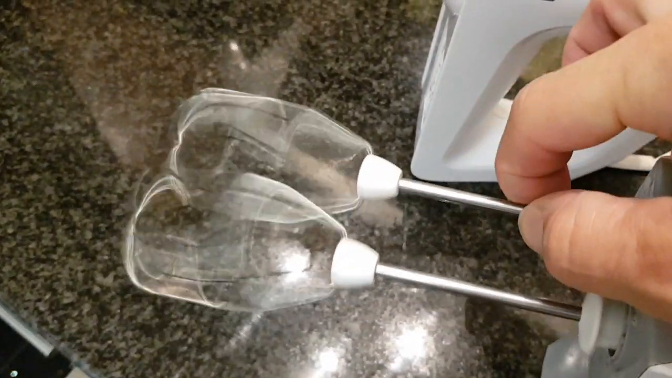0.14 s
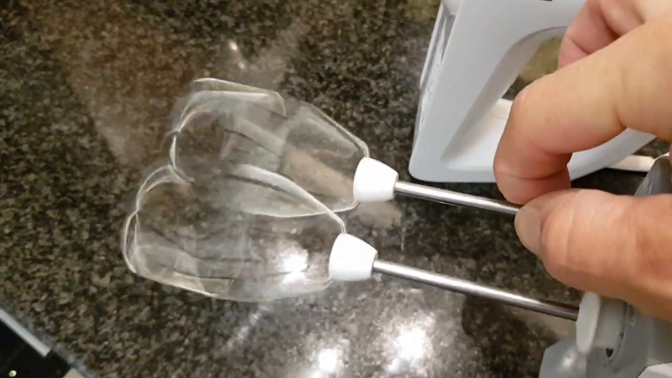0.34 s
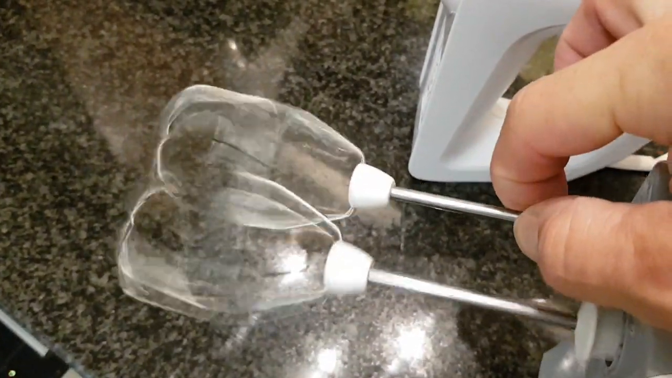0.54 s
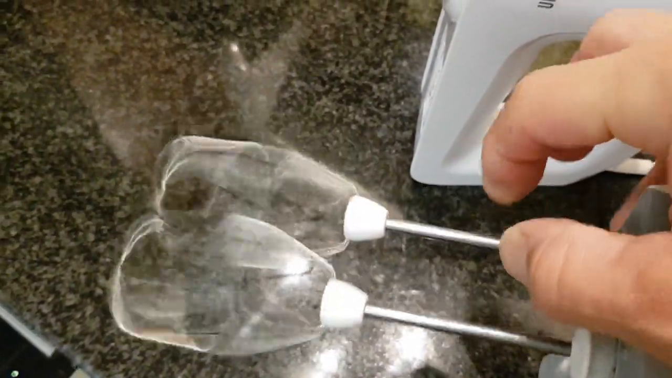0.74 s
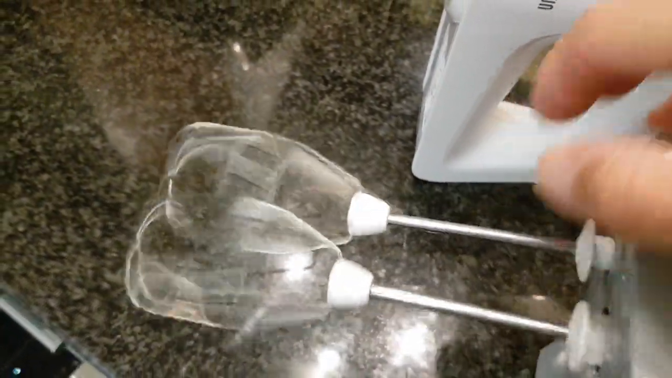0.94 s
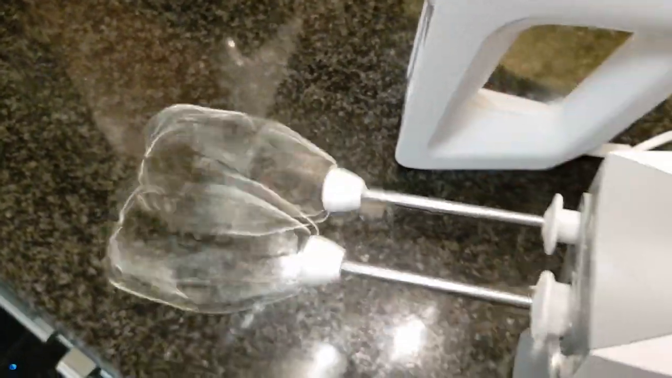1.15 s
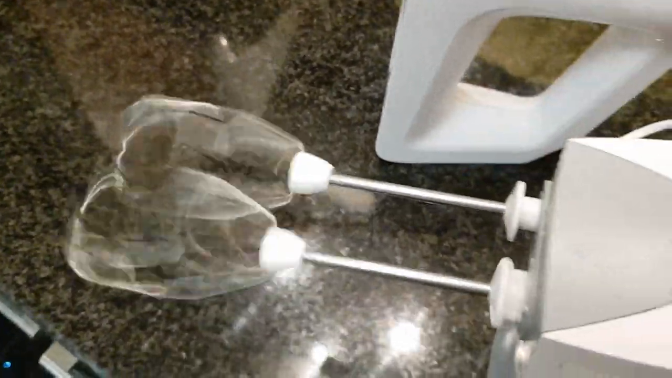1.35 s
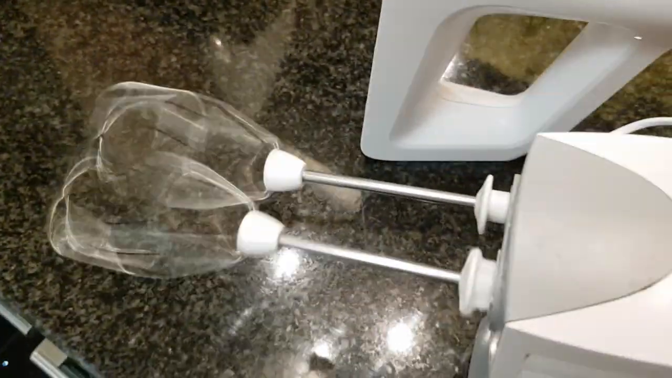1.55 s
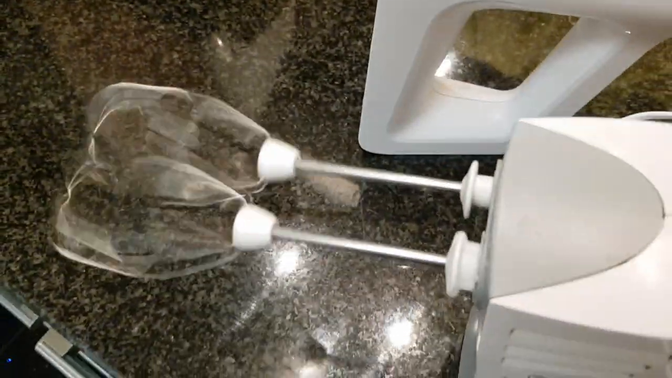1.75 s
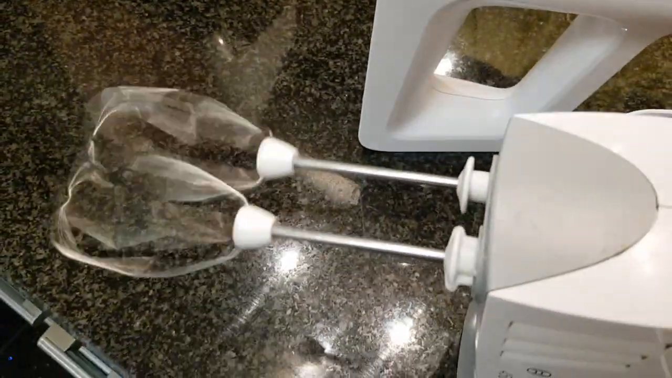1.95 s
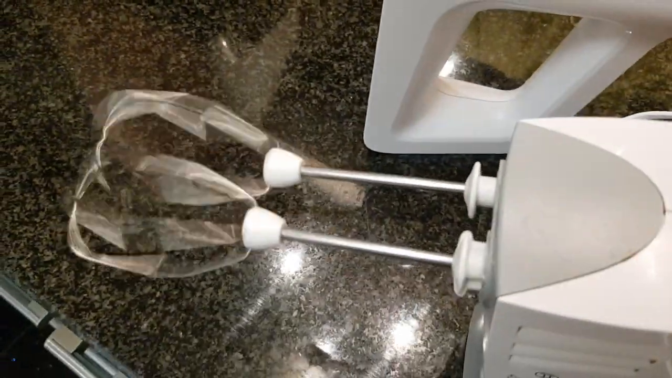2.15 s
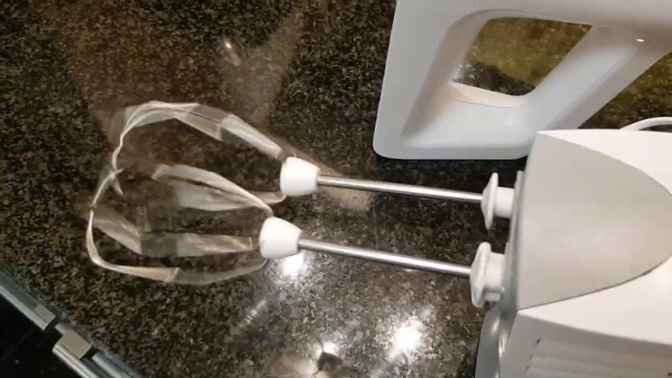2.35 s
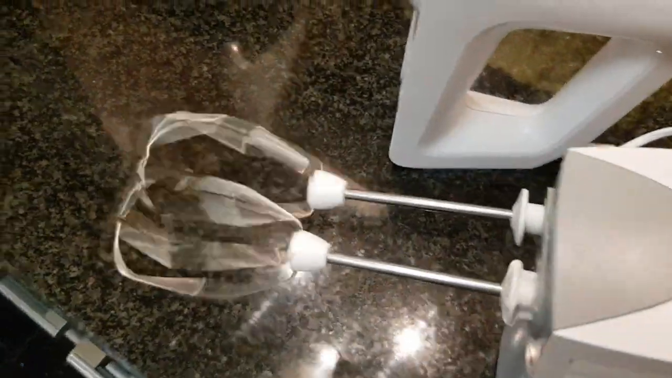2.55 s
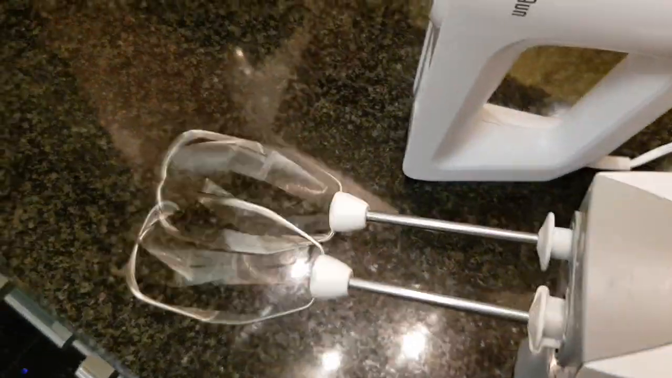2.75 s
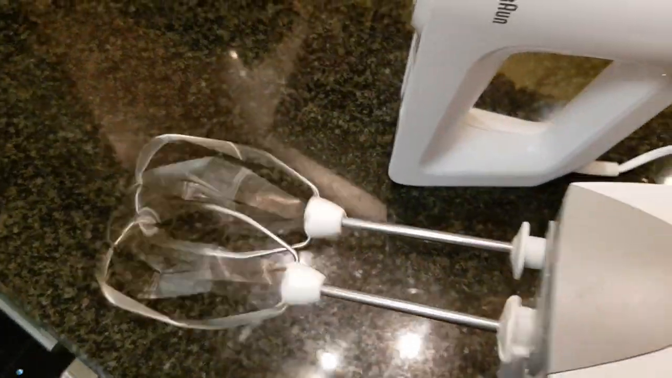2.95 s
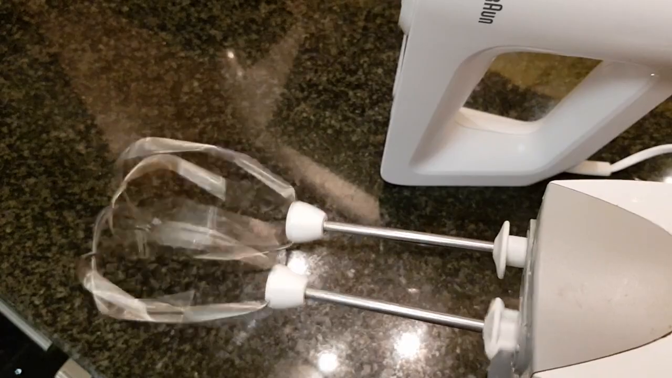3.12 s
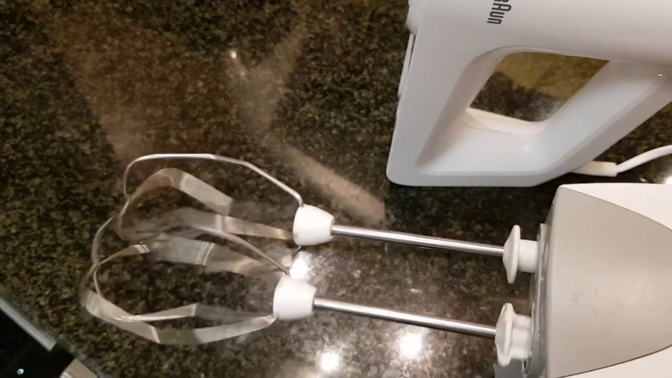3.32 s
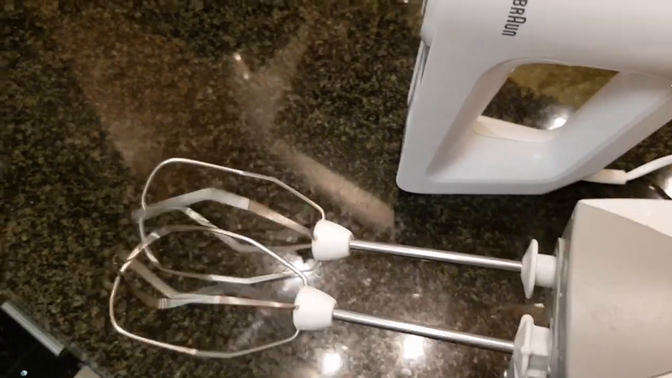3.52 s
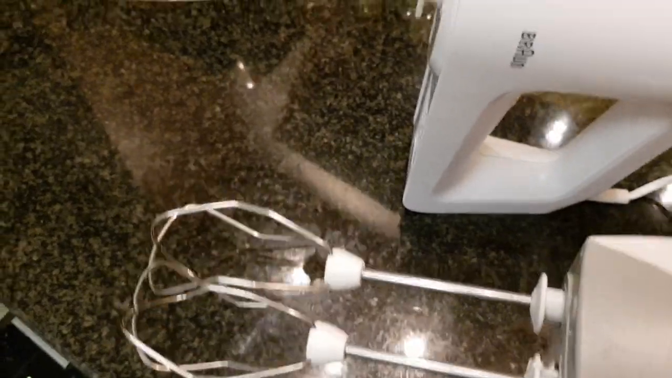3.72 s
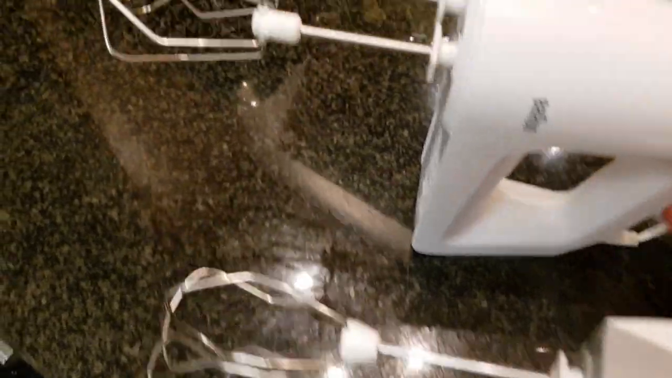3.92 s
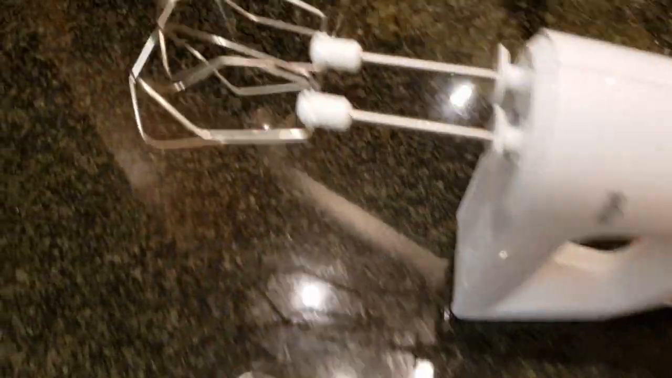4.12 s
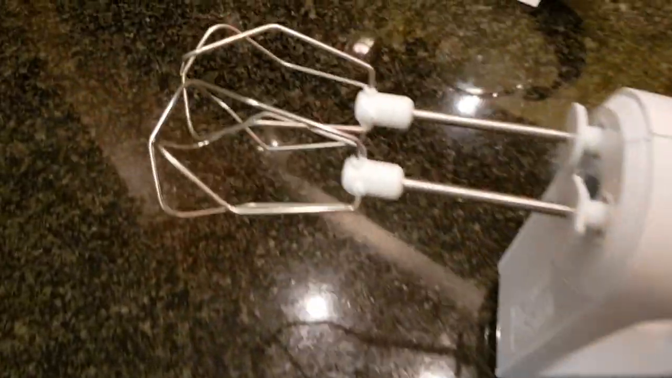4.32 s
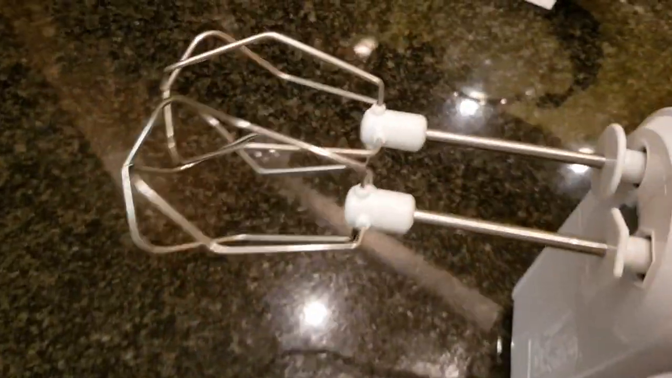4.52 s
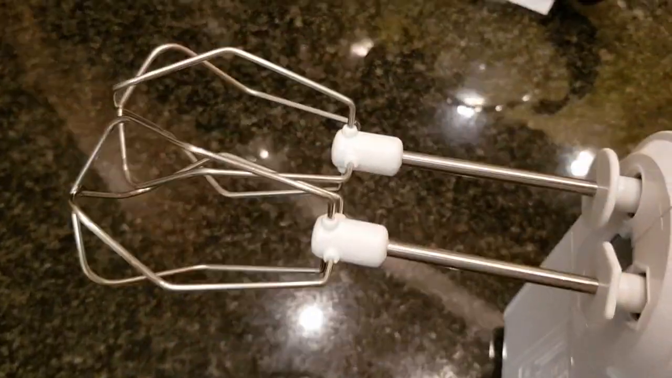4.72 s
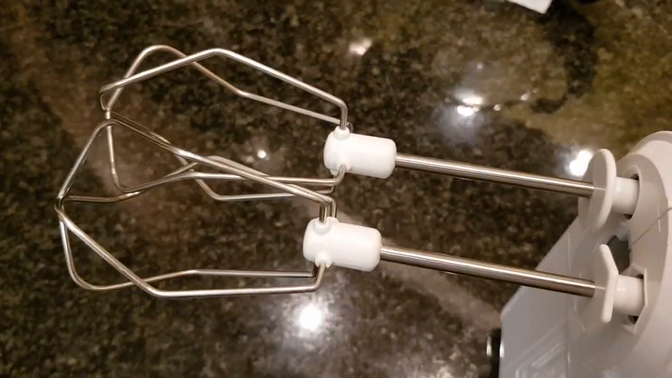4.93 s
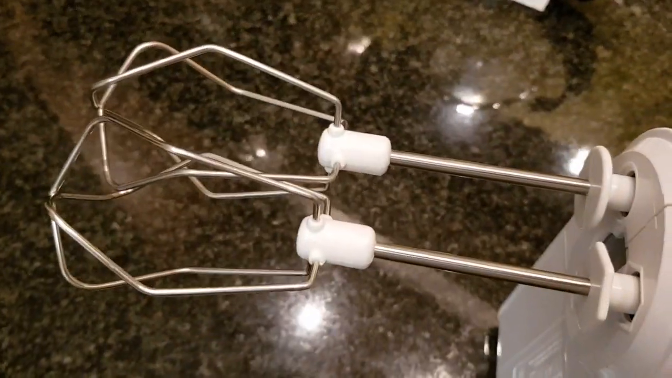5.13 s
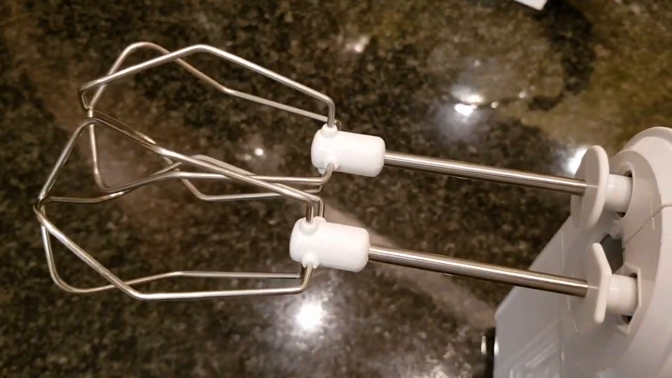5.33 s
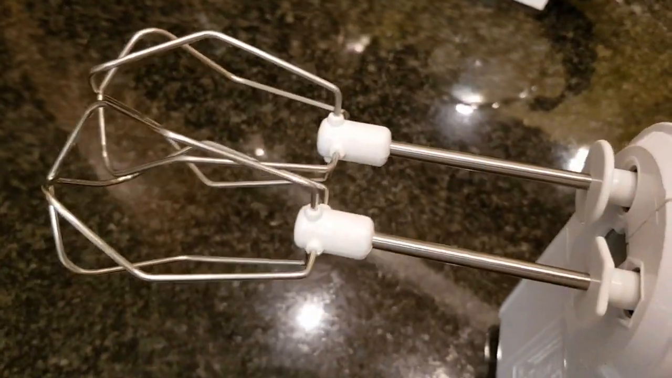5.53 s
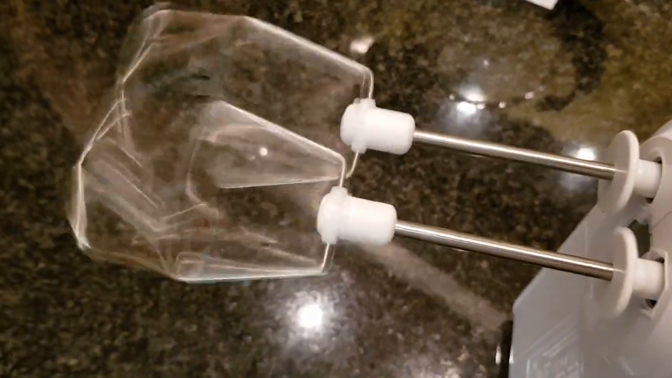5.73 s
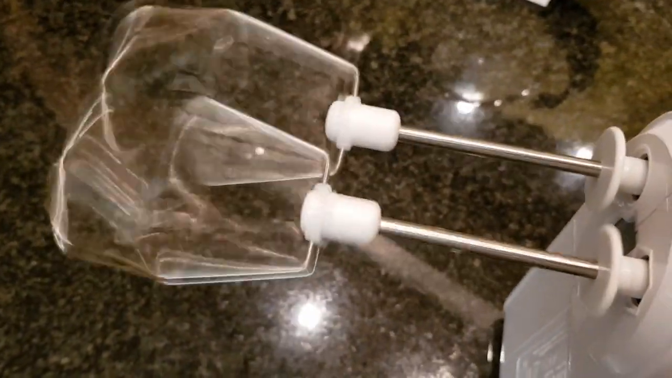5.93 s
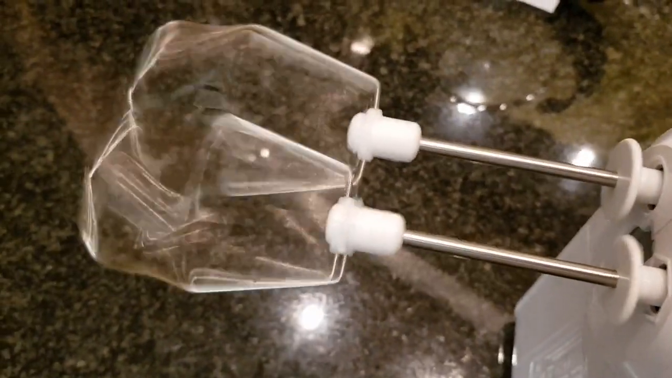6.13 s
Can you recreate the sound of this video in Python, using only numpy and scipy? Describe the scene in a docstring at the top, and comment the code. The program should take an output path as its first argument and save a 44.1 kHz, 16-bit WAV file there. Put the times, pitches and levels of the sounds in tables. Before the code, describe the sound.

An electric hand mixer is already whirring close by in a kitchen, its beaters spinning in the air with a fine gear rattle, hiss and thin whine. It speeds up slightly around 0.6 seconds, with a light knock. From about 1.8 seconds the pitch falls and a plastic switch clicks, and the motor settles into a slower, softer run, with small knocks near 2.4 and 2.7 seconds. At 3.2 seconds the switch clicks off and the motor winds down, stopping by 3.8 seconds. The mixer slides briefly and softly over the stone counter, leaving a faint room hum. A few light handling knocks come around 5.2 seconds as a second mixer is picked up. At about 5.7 seconds it starts abruptly with a raspy surge and keeps running, louder and brighter than the first, until the end at about 6.4 seconds.

```python
"""Two electric hand mixers spin wire beaters in the air, close by, over a stone kitchen counter.
Gear impacts excite the resonances of the plastic housings, brushes hiss on the commutators, and
tones sound at multiples of the rotor speed. The first mixer is clicked down to a slower speed,
switched off and braked to rest by friction; it is slid aside, and the second is picked up and
starts with a louder, brighter whirr. A quiet room hums underneath."""
import sys
import numpy as np
from scipy import signal
from scipy.fft import rfft, irfft
from scipy.io import wavfile
from scipy.ndimage import uniform_filter1d, map_coordinates

SR = 44100
rng = np.random.default_rng(int(sys.argv[2]) if len(sys.argv) > 2 else 0)


def digitize_waveform(pressure):
    """Quantize a signal to 16-bit integers and store it at the path in sys.argv[1].

    Rows of a 2-D input are taken as channels; values are limited to [-1, 1].
    """
    field = np.atleast_2d(pressure).T
    bounded = np.clip(field, -1, 1)
    quanta = np.round(bounded * 32767).astype(np.int16)
    wavfile.write(sys.argv[1], SR, quanta)


N = 276507

# Levels in the tables are relative. An order is a multiple of the rotor speed.
# ventilation noise spectrum: f/Hz, level/dB
ROOM_SPECTRUM = [(20, -30.5), (60, -14.5), (100, -3.5), (150, -18.5), (260, -8), (380, -1.5), (550, -14),
                 (1000, -24), (2500, -32), (6000, -35.5), (8500, -43), (13000, -30.5), (15700, -36)]
# appliance hum: f/Hz, level/dB
HUM_PARTIALS = [(102.3, -79.5), (145.3, -87.5), (199.2, -77.5), (296.1, -73.5)]
# a slide over the counter, then fingers on the handle: t/s, duration/s, level/dB
RUBS = [(3.798, 0.24, -53), (4.3, 0.11, -73), (4.602, .08, -65.5)]
# spectra of rubbing and of a blow on plastic: f/Hz, level/dB
RUB_SPECTRUM = [(530, -34), (900, -12.5), (991, -13), (1070, -19), (1490, -5), (2040, -2), (3190, 0),
                (7860, -3.5), (12300, -1), (16000, -3.5)]
PLASTIC_SPECTRUM = [(60, -23.5), (250, -29.5), (450, -7), (1100, -5), (2300, -9), (4500, -12),
                    (8000, -19.5), (16000, -7.5)]
# modes of the struck shell: f/Hz, width/Hz, gain/dB
PLASTIC_MODES = [(450, 60, 3.7), (618, 60, 1.7), (810, 160, 2.3), (1210, 140, 3.8), (2360, 250, 4.5),
                 (4170, 460, 3.4)]
# switch clicks; knocks of shafts and handles: t/s, level/dB, cutoff/Hz, ring time/s, hollow note/Hz
CLICKS = [(1.9015, -5.5, 13200, 0.098, 1000), (3.179, -10, 16080, 0.018, 450),
          (3.1815, -5.5, 9000, 0.042, 1118), (3.191, -16.5, 7060, .13, 460)]
KNOCKS = [(.712, -17, 2530, 0.075, 930), (2.4275, -14, 2300, 0.14, 910), (2.699, -21.5, 1980, 0.049, 1214),
          (3.321, -19, 760, 0.096, 597), (3.995, -37.5, 890, 0.32, 714), (4.545, -54, 1995, 0.12, 725),
          (5.203, -34.5, 1496, 0.17, 755), (5.224, -29, 1650, 0.15, 771), (5.393, -43.5, 1800, 0.24, 760),
          (5.590, -46, 1500, 0.08, 780)]
# spectra of gear rattle and brush hiss (A is the first mixer, B the second): f/Hz, level/dB
GEAR_SPECTRUM_A = [(20, -36.5), (45, -25), (110, -14), (300, -9.5), (550, -4.5), (950, 0.5), (1300, -1.5),
                   (2200, -9.5), (3100, -14.5), (4500, -17.5), (7000, -22), (9000, -47), (16000, -52.5)]
GEAR_SPECTRUM_B = [(20, -42), (60, -35), (150, -27.5), (350, -7.5), (650, -5), (1100, -2), (2200, -1),
                   (3200, -1), (4500, 0), (7000, -10.5), (9000, -21), (16000, -47)]
BRUSH_SPECTRUM_A = [(2000, -13.5), (4000, -14.5), (6500, -4), (8200, -12), (9800, -4), (11000, -4),
                    (12000, 4), (14000, 3), (16000, -1.5)]
BRUSH_SPECTRUM_B = [(3000, -23.5), (6500, -0.5), (8000, -3.5), (10000, -0.5), (11300, 0), (12000, 6.5),
                    (13500, -0.5), (16000, -3)]
# housing resonances and dips: f/Hz, width/Hz, gain/dB
HOUSING_MODES_A = [(558, 130, -4.5), (624.6, 20, 7), (867, 51, 4), (952, 100, 3.5), (1040, 70, 0),
                   (1293, 160, -5), (1410, 130, 3.5), (1700, 62, -6.5), (1925, 190, 9.5), (2437, 540, 6.5),
                   (2750, 790, -1), (4420, 340, 4.5), (5690, 1600, -2.5)]
HOUSING_MODES_B = [(390, 92, -16.5), (515, 64, 4), (1034, 77, 4.5), (1497, 79, 6), (2072, 110, 9),
                   (2274, 290, 6), (2920, 200, -0.5), (5540, 530, -5.5), (5880, 250, 5), (6910, 260, 9)]
# tones of rotor unbalance, commutator whine, the low setting and the second motor: order, level/dB
UNBALANCE_TONES_A = [(1, -13.5), (2, -14.5)]
COMMUTATOR_TONES_A = [(24, -28.5), (36, -25), (48, -23), (60, -22), (72, -20.5), (80, -21), (96, -24)]
LOW_SETTING_TONES_A = [(2, -13), (7, -8), (9, -10), (12, -8), (48, -15.5), (60, -17.5), (72, -27),
                       (84, -17), (96, -25), (144, -17)]
MOTOR_TONES_B = [(1, -30), (3, -13.5), (6, -18), (12, -10), (19, -21), (36, -26)]
# how the first mixer is held: t/s, closeness gain/dB, hiss gain as the vents face the listener/dB
HOLD_A = [(0, -0.5, 2), (.6, -.5, 2.5), (.76, -1, -2), (1.5, 1, 0.5), (2.3, -2, 3.5), (3.1, 0, 2)]

CURRENT_PEAKS_HZ = 100  # the mains current peaks twice a cycle
INITIAL_HZ, FREE_HZ, LOW_HZ = 159.8, 164.1, 72.5  # first rotor: at first, running freely, set low
RUNS_FREE_S, TURNED_DOWN_S, SWITCHED_OFF_S = .58, 1.746, 3.211
TIME = np.arange(N) / SR


def undb(db):
    """Amplitude ratio of a level in decibels."""
    return 10 ** (np.asarray(db) / 20)


def since(start):
    """Time elapsed after a moment, 0 before it."""
    return np.maximum(TIME - start, 0)


def ramp(start, length):
    """Linear rise from 0 to 1."""
    return np.minimum(since(start) / length, 1)


def drift(rate):
    """Band-limited noise: rate independent values a second, spread near 1."""
    count = int(rate * N / SR) + 4
    smooth = signal.resample(rng.standard_normal(count), count * 8)
    return np.interp(TIME * 8 * rate, np.arange(len(smooth)), smooth)


def colour(x, spectrum, modes=(), size=8192):
    """Minimum-phase filter: a smooth spectrum with resonance peaks and dips on top."""
    f = np.arange(size // 2 + 1) * SR / size + 1
    hz, db = np.transpose(spectrum)
    db = np.interp(np.log(f), np.log(hz), db)
    for centre, width, lift in modes:
        db = db + lift / (1 + (2 * (f - centre) / width) ** 2)
    cepstrum = irfft(np.log(undb(db)))[:size // 2]
    cepstrum[0] /= 2
    return signal.oaconvolve(x, irfft(np.exp(rfft(2 * cepstrum, size))))[:N]


def band(x, hz, kind, order=2):
    """Butterworth filter."""
    sections = signal.butter(order, np.clip(hz, 10, .45 * SR), kind, fs=SR, output="sos")
    return signal.sosfilt(sections, x)


def unit(x, band_hz=None):
    """Normalisation to rms 1, overall or within a band."""
    return x / np.std(x if band_hz is None else band(x[:SR], band_hz, "bandpass", order=4))


def kitchen(x, wet_db, left_db, lag_s, spread=.7, wall_t60=.36, counter_t60=.13):
    """Reverberation at two points: direct sound, early counter reflections, then the walls."""
    t = np.arange(SR // 3) / SR
    noise = rng.standard_normal((3, len(t))) * (t > .001)
    tails = noise * undb(-60 * t / np.array([[wall_t60], [wall_t60], [counter_t60]]))
    walls, walls_side, counter = tails / np.linalg.norm(tails, axis=1, keepdims=True)
    mid = (t == 0) + undb(wet_db) * walls
    # treble that differs between the two points moves from mid to side
    mid = mid - (1 - np.sqrt(1 - spread ** 2)) * band(mid, 1800, "highpass", order=1)
    side = spread * band(counter, 1800, "highpass", order=1) + .65 * undb(wet_db) * walls_side
    left = np.pad(mid + side, (round(lag_s * SR), 0))
    left = left + (undb(left_db) - 1) * band(left, 3200, "highpass", order=1)  # shaded: less treble
    return np.array([signal.oaconvolve(x, path)[:N] for path in (left, mid - side)])


def room():
    """Ambient noise: ventilation rumble and appliance hum, with hiss that differs left and right."""
    mid, side = (colour(rng.standard_normal(N), ROOM_SPECTRUM) for _ in range(2))
    side = (.35 * side + 1.1 * band(side, 900, "highpass", order=1)) / mid.std()
    air = (unit(mid) + side * np.array([[1], [-1]])) * undb(-66.5 + .83 * drift(9))
    hum = sum(undb(db + 2 * drift(2.9)) * np.sin(2 * np.pi * hz * TIME) for hz, db in HUM_PARTIALS)
    return air + hum


def rubs(attack_s=.096, release_db_per_s=210):
    """Sliding friction: noise that swells, holds unevenly and dies away."""
    pressure = sum(ramp(start, attack_s) ** 2 * undb(db - release_db_per_s * since(start + length))
                   for start, length, db in RUBS)
    return pressure * undb(1.1 * drift(30)) * unit(colour(rng.standard_normal(N), RUB_SPECTRUM))


def blows(rows, crack_db, crack_s, hollow_db, hollow_width_hz):
    """Impact excitation: a crack and a fading buzz of loose parts ring the shell and a hollow part."""
    force, t = np.zeros(N), np.arange(SR // 4) / SR
    for start, db, contact_hz, ring_s, hollow_hz in rows:
        envelope = undb(crack_db - 60 * t / crack_s) + undb(-60 * t / ring_s)
        hit = rng.standard_normal(len(t)) * envelope
        hollow_band = hollow_hz + hollow_width_hz * np.array([-.5, .5])
        hit = hit + undb(hollow_db) * band(hit, hollow_band, "bandpass", order=1)
        i = int(start * SR)
        force[i:i + len(t)] += undb(db) * band(hit, contact_hz, "lowpass")[:N - i]  # soft means dull
    return colour(force, PLASTIC_SPECTRUM, PLASTIC_MODES)


def handling():
    """Contact noise: impacts of switches, shafts and handles, and friction of sliding and gripping."""
    clicks = undb(-5.5) * blows(CLICKS, crack_db=7, crack_s=.012, hollow_db=7, hollow_width_hz=130)
    knocks = undb(-1.5) * blows(KNOCKS, crack_db=-4.5, crack_s=.007, hollow_db=11, hollow_width_hz=67)
    impacts = kitchen(clicks + knocks, wet_db=-9, left_db=-5, lag_s=23e-6, spread=.63, counter_t60=.07)
    return impacts + kitchen(rubs(), wet_db=-7.5, left_db=-1, lag_s=76e-6)


def rotor(speed, flutter):
    """Phase in turns: the integral of a slightly unsteady speed."""
    return np.cumsum(speed * (1 + flutter * drift(14))) / SR


def tones(turns, orders, waver_db):
    """Rotational harmonics: phase-locked to the rotor, wavering in level."""
    return sum(np.sqrt(2) * undb(db + waver_db * drift(12))
               * np.sin(2 * np.pi * (order * turns + rng.random())) for order, db in orders)


def brushes(turns, spectrum, scrape_db, bar_depth, mains_depth):
    """Modulated noise: brushes scrape the same bumps each turn and spark, pulsing with the mains."""
    bumps = rng.standard_normal(256)
    scrape = map_coordinates(bumps, [turns % 1 * len(bumps)], order=3, mode="grid-wrap")
    sparks = rng.standard_normal(N) * (1 + bar_depth * np.sin(2 * np.pi * 6 * turns))
    current = 1 + mains_depth * np.cos(2 * np.pi * CURRENT_PEAKS_HZ * TIME)
    hiss = colour((sparks + undb(scrape_db) * scrape) * current, spectrum)
    return unit(hiss, (9000, 15500))


def gears(turns, soft_gain, hard_gain, spectrum, modes,
          ticks_per_s, scatter_db, rotor_depth, throb_db, split_hz):
    """Forced vibration: loose teeth and shafts tick into the housing, pulsing with rotor and beaters."""
    ticks = (rng.random(N) < ticks_per_s / SR) * rng.choice([-1, 1], N)
    ticks = ticks * undb(scatter_db * rng.standard_normal(N))
    beater_turns = turns / 12
    rotor_pulse = 1 + rotor_depth * np.sin(2 * np.pi * turns)
    throb = undb(throb_db * (np.sin(2 * np.pi * beater_turns) + drift(50)))
    rattle = colour(ticks * rotor_pulse * throb, spectrum, modes)
    soft, hard = unit(rattle, (500, 1300)), unit(rattle, (1500, 5000))
    # harder contacts supply the clatter above the split
    soft = band(band(soft, split_hz, "lowpass"), split_hz, "lowpass")
    hard = band(band(hard, split_hz, "highpass"), split_hz, "highpass")
    return soft_gain * soft + hard_gain * hard


def second_mixer(start_s=5.653, full_speed_hz=362, spin_up_s=.033, surge_s=.19):
    """Starting transient: a fast motor jumps to speed; its surge, rasp and hum decay exponentially."""
    age, on = since(start_s), ramp(start_s, .017) ** 2
    spun_up = 1 - np.exp(-age / spin_up_s)
    turns = rotor(full_speed_hz * spun_up, flutter=.003)
    surge = np.exp(-age / surge_s)
    soft = on * undb(-31 + 2.7 * surge)
    hard = on * undb(-23.5 + 3 * surge) * np.sqrt(spun_up)
    brush = on * undb(-30 + 2.5 * surge)
    rasp_gain = undb(4.5) * spun_up * np.exp(-age / .14)  # teeth bring the beaters up to speed
    sparking = undb(1.7 + 1.3 * drift(35))
    whirr = 0
    for side in range(2):
        rattle = gears(turns, soft, hard, GEAR_SPECTRUM_B, HOUSING_MODES_B,
                       ticks_per_s=2203, scatter_db=2, rotor_depth=.31, throb_db=1, split_hz=1040)
        rasp = rasp_gain * band(rattle, (2940, 4250), "bandpass", order=1)
        hiss = brush * brushes(turns, BRUSH_SPECTRUM_B, scrape_db=-10, bar_depth=.19, mains_depth=.74)
        whirr += kitchen(rattle + rasp + sparking * hiss, wet_db=-9.5, left_db=-6, lag_s=140e-6)
    whine = brush * tones(turns, MOTOR_TONES_B, waver_db=2.5)
    inrush_hum = on * undb(-44.5) * np.exp(-age / .09) * np.sin(2 * np.pi * CURRENT_PEAKS_HZ * age)
    tonal = kitchen(whine + inrush_hum, wet_db=-5, left_db=-1, lag_s=113e-6, spread=.18)
    return whirr / np.sqrt(2) + tonal


def first_speed(braking_hz_per_s=130):
    """Uniform deceleration: friction slows the rotor to its low setting, and later to rest."""
    high = INITIAL_HZ + (FREE_HZ - INITIAL_HZ) * ramp(RUNS_FREE_S, .18)
    driven = np.maximum(high - braking_hz_per_s * since(TURNED_DOWN_S), LOW_HZ)
    return np.maximum(driven - braking_hz_per_s * since(SWITCHED_OFF_S), 0)


def first_mixer(stall_hz=11, load_change_s=.19):
    """Power laws: mellow rattle, hiss and fan whine each follow a power of the rotor speed."""
    speed = first_speed()
    hold_s, *hold_db = np.transpose(HOLD_A)
    close_db, vents_db = (np.interp(TIME, hold_s, db) for db in hold_db)
    turns = rotor(speed, flutter=.0013)
    moving = np.minimum(speed / stall_hz, 1)
    coasting = uniform_filter1d(1. * (np.gradient(speed) < 0), int(load_change_s * SR))

    def speed_law(db, power, coast_db):
        """Amplitude as a power of speed, slackening while the rotor coasts."""
        return moving * undb(db + close_db + coast_db * coasting) * (speed / FREE_HZ) ** power

    soft = speed_law(-31, power=1.27, coast_db=-1.2)
    hard = speed_law(-29, power=2.35, coast_db=-1)
    brush = speed_law(-40, power=1.34, coast_db=-1.7) * undb(vents_db)
    fan = speed_law(-39, power=9, coast_db=-1) * ramp(RUNS_FREE_S, .23) ** 2
    whirr = 0
    for side in range(2):  # a gear and a brush on each side, each side with its own sound path
        rattle = gears(turns, soft, hard, GEAR_SPECTRUM_A, HOUSING_MODES_A,
                       ticks_per_s=1707, scatter_db=1.5, rotor_depth=.26, throb_db=.6, split_hz=970)
        hiss = brush * brushes(turns, BRUSH_SPECTRUM_A, scrape_db=-7, bar_depth=.48, mains_depth=.13)
        whirr += kitchen(rattle + undb(.8) * hiss, wet_db=-9, left_db=-4.2, lag_s=91e-6)
    low_setting = (speed < 1.1 * LOW_HZ) * (1 - coasting)
    high_setting = np.clip((speed / LOW_HZ - 1) * 10, 0, 1)
    unbalance = (speed / FREE_HZ) ** 2 * tones(turns, UNBALANCE_TONES_A, waver_db=2)
    bar_whine = high_setting * tones(turns, COMMUTATOR_TONES_A, waver_db=2.5)
    low_whine = low_setting * tones(turns, LOW_SETTING_TONES_A, waver_db=3)
    fan_whine = fan * tones(turns, [(10, -1)], waver_db=2.1)  # ten blades
    tonal = brush * (unbalance + bar_whine + low_whine) + fan_whine
    return whirr / np.sqrt(2) + kitchen(tonal, wet_db=-14, left_db=-2, lag_s=20e-6, spread=.45)


def scene():
    """Superposition of both mixers, the hands and the room."""
    return first_mixer() + second_mixer() + handling() + room()


def record(dry, cutoff_hz=15850):
    """Band limiting: a steep low-pass removes the highest treble."""
    return signal.sosfilt(signal.ellip(10, .2, 80, cutoff_hz, fs=SR, output="sos"), dry)


dry = scene()
out = record(dry)
digitize_waveform(out)
```